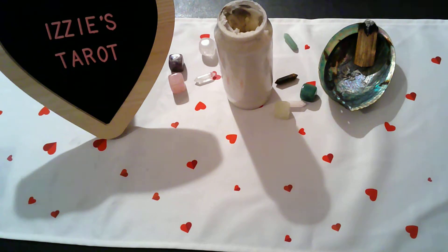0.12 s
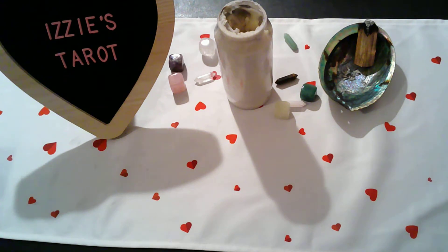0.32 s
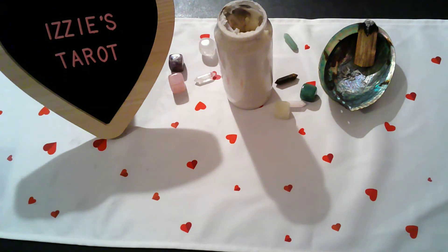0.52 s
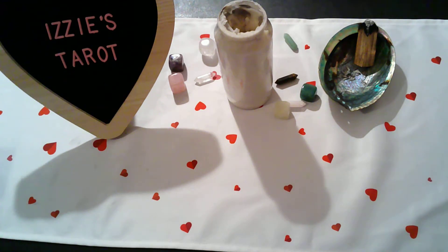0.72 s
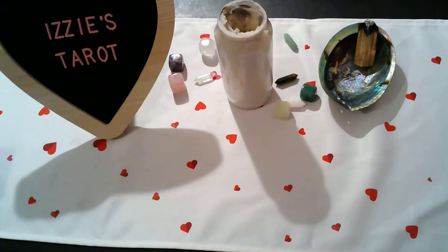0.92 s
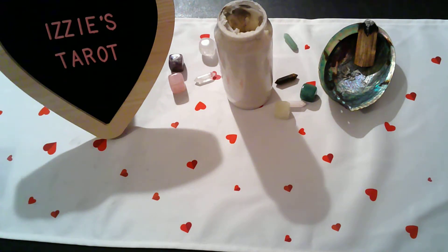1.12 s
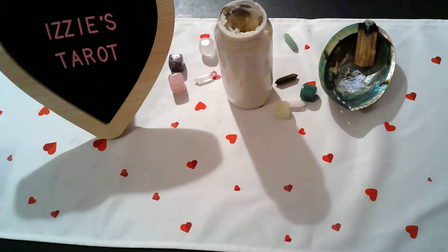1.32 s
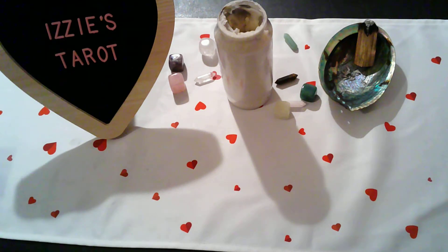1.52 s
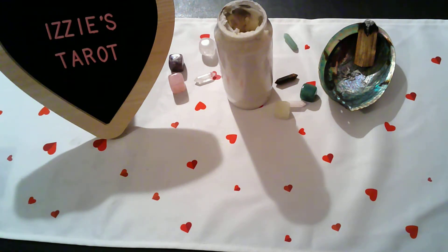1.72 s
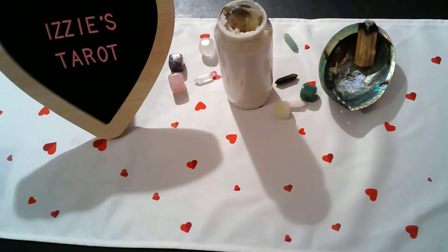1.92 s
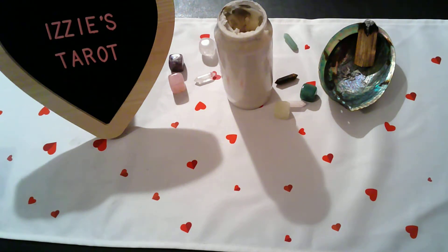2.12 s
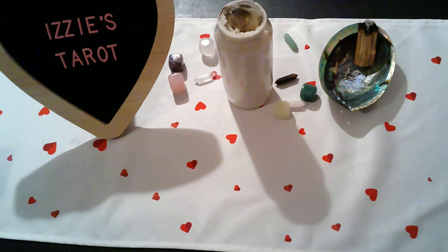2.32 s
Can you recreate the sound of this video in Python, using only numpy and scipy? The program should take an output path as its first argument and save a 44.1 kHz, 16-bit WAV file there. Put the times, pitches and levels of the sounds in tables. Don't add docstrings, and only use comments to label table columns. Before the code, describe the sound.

A stiff card snaps off a deck at about 0.2 seconds, a tight cluster of sharp, papery clicks with a small low thump, the loudest moment. Faint brushing and rustling follow, with a light tap near 0.74. After very quiet movements, a card pats softly onto cloth at 2.17, then edges brush lightly around 2.3. Small, dry, quiet room with low rumble; close, slightly ringing microphone with dulled treble.

```python
import sys
import numpy as np
from scipy import signal
from scipy.fft import rfft, irfft
from scipy.io import wavfile
from scipy.ndimage import uniform_filter1d

SR = 44100
rng = np.random.default_rng(int(sys.argv[2]) if len(sys.argv) > 2 else 0)


def boost(x):
    u = np.asarray(x, float) / 20
    return 10 ** u


def master(y):
    cut = np.clip(np.atleast_2d(y).T, -1, 1)
    pcm = np.round(cut * 32767)
    wavfile.write(sys.argv[1], SR, pcm.astype(np.int16))


N = 108045


def since(at_s):
    return np.arange(N) / SR - at_s


def unit(x):
    return x / np.sqrt(np.mean(x ** 2))


def band(x, hz, width_hz):
    b, a = signal.iirpeak(min(hz, 0.45 * SR), hz / width_hz, fs=SR)
    return signal.lfilter(b, a, x)


def butter(x, hz, kind, order):
    return signal.sosfilt(signal.butter(order, hz, kind, fs=SR, output="sos"), x)


def walk(rate_hz):
    span = int(SR / rate_hz)
    drift = uniform_filter1d(rng.standard_normal(N), span)
    return unit(uniform_filter1d(drift, span))


def ring(at_s, hz, t60_s):
    age = np.maximum(since(at_s), 0)
    return np.sin(2 * np.pi * hz * age) * np.exp(-np.log(1000) * age / t60_s)


def touch(at_s, rise_s, fall_s):
    age = since(at_s)
    return np.exp(-(age / np.where(age < 0, rise_s, fall_s)) ** 2 / 2)


def fibres():
    clicks_per_s, uneven_db = 3000, 3
    chance = rng.random((2, N))
    strength = boost(-uneven_db * np.log(chance[1] + 1e-9))
    clicks = (chance[0] < clicks_per_s / SR) * strength * rng.standard_normal(N)
    grain = unit(clicks) + 0.8 * rng.standard_normal(N)
    return grain * boost(1.6 * walk(80))


def room_tone():
    # f/Hz, level per Hz/dB
    tone = np.array([(30, -5), (60, -4.5), (110, 2.5), (300, -4.5), (700, -14.5), (2000, -18.5),
                     (4800, -35.5), (8000, -45.5)])
    level_db, flicker_db, flicker_hz = -57.5, 1.24, 3.85
    hz = np.maximum(np.fft.rfftfreq(N, 1 / SR), 1)
    colour = boost(np.interp(np.log(hz), np.log(tone[:, 0]), tone[:, 1]))
    spectrum = rfft(rng.standard_normal(N)) * colour * (hz > 18)
    air = 0
    for octave in range(10):
        share = np.clip(1 - np.abs(np.log2(hz / 25) - octave), 0, 1)
        air = air + irfft(spectrum * share, N) * boost(flicker_db * walk(flicker_hz))
    return unit(air) * boost(level_db)


def brushes():
    # peak t/s, rise/s, fall/s, level/dB, scrape f/Hz
    scrapes = [(.002, 0.012, 0.013, -57, 2100), (.004, .01, 0.023, -63.5, 595),
               (.004, 0.012, 0.028, -66, 3270), (0.181, 0.0027, 0.025, -59, 2200),
               (0.199, .008, 0.0098, -53, 1200), (0.228, 0.013, 0.004, -47.5, 2450),
               (.33, 0.033, 0.045, -68, 1500), (.448, 0.019, 0.016, -62.5, 2360),
               (.58, 0.044, 0.01, -75, 890), (0.745, 0.0051, 0.021, -61, 1950),
               (.745, 0.011, 0.013, -64, 3070), (.448, .01, 0.021, -68.5, 880),
               (1.219, 0.07, 0.013, -71, 1110), (1.40, .008, .015, -70, 2600),
               (1.53, 0.0042, .04, -74, 1500), (2.143, .012, 0.014, -55.5, 3270),
               (2.172, .008, 0.011, -59.5, 1270), (2.171, 0.0075, 0.0057, -50.5, 2670),
               (2.296, 0.0089, 0.014, -65, 1870), (2.339, 0.015, .008, -54, 1840),
               (2.328, 0.0035, .014, -57, 2600), (2.341, 0.0044, 0.0094, -65, 1280)]
    body_hz, body_top_hz, body_db = 743, 2600, -2.5
    relative_width = 0.23
    grain = fibres()
    body = butter(band(grain, body_hz, body_hz), body_top_hz, "low", order=2)
    body = boost(body_db) * unit(body)
    out = np.zeros(N)
    for at_s, rise_s, fall_s, db, hz in scrapes:
        width_hz = relative_width * hz
        edge = unit(band(band(grain, hz, width_hz), hz, 2.07 * width_hz))
        out += boost(db) * touch(at_s, rise_s, fall_s) * (edge + body)
    return out


def rustles():
    # peak t/s, rise/s, fall/s, level/dB
    movements = [(.008, .01, 0.023, -61.5), (.07, .02, 0.1, -78.5), (.2, .006, .012, -53),
                 (.35, 0.046, 0.021, -68.5), (.45, 0.026, 0.034, -70.5), (.54, 0.044, 0.032, -72),
                 (.67, 0.011, 0.063, -76.5), (.755, 0.013, .04, -70), (.86, 0.032, 0.053, -72.5),
                 (.96, 0.015, .02, -72), (1.18, 0.035, 0.025, -69.5), (1.22, 0.019, 0.023, -69),
                 (1.405, .02, 0.017, -70), (1.529, 0.0045, 0.036, -74), (1.72, 0.025, 0.063, -76.5),
                 (1.93, 0.055, .02, -75.5), (2.145, 0.014, 0.013, -64), (2.167, 0.01, 0.015, -57.5),
                 (2.24, .03, .03, -78), (2.29, 0.036, 0.03, -68), (2.349, 0.016, 0.017, -63),
                 (2.41, .03, .03, -75)]
    hiss = unit(butter(fibres(), 3700, "high", order=2))
    swell = np.zeros(N)
    for at_s, rise_s, fall_s, db in movements:
        swell += boost(db) * touch(at_s, rise_s, fall_s)
    return hiss * swell


def flicks():
    # t/s, level/dB, bending f/Hz, ring/s, crack level against the bending/dB
    snaps = [(0.1769, -44, 2000, .006, -9), (0.1901, -25.5, 1410, 0.0039, -18),
             (.1965, -35.5, 1000, .004, -8), (.2107, -25, 500, 0.031, -42),
             (0.2114, -19, 1633, .011, -14.5), (.2130, -17, 1115, 0.0056, -18.5),
             (0.2135, -17.5, 2400, 0.0059, -15), (.2145, -17.5, 1020, 0.01, -15),
             (.2160, -23, 3450, 0.0027, -19), (.2184, -20, 2080, 0.0047, -28),
             (0.2224, -24, 1630, 0.0071, -13), (.2283, -28.5, 1000, 0.0023, -19),
             (0.2299, -32.5, 1590, 0.007, -13), (0.7372, -47.5, 1800, 0.0093, -27),
             (.7430, -43, 810, 0.012, -26), (2.1675, -44.5, 4960, 0.0077, 1.5),
             (2.1760, -47, 2660, 0.004, -14), (2.2934, -54.5, 3000, .002, 0.5)]
    crack_fade_s = 0.0015
    noise = rng.standard_normal(N)
    out = np.zeros(N)
    for at_s, db, hz, t60_s, crack_db in snaps:
        age = since(at_s)
        crack = (age >= 0) * np.exp(-np.abs(age) / crack_fade_s) * noise
        out += boost(db) * (ring(at_s, hz, t60_s) + boost(crack_db) * crack)
    return out


def pats():
    # t/s, level/dB, f/Hz, ring/s
    thumps = [
        (0.1941, -27.5, 330, 0.0078),
        (0.2128, -26, 239, 0.026),
        (.7350, -43.5, 316, 0.031),
        (2.1675, -26, 343, 0.014),
        (2.172, -39, 210, .03),
    ]
    out = np.zeros(N)
    for at_s, db, hz, t60_s in thumps:
        soft_start = 1 - np.exp(-np.abs(since(at_s)) * hz * 7.6)
        out += boost(db) * ring(at_s, hz, t60_s) * soft_start
    return out


def room(x):
    t60_s, level_db, gap_s, top_hz = 0.25, -12, 0.0032, 5130
    age = np.arange(SR // 2) / SR
    fade = (age > gap_s) * np.exp(-np.log(1000) * age / t60_s)
    tail = butter(rng.standard_normal(len(age)) * fade, top_hz, "low", order=1)
    tail = tail / np.sqrt(np.sum(tail ** 2))
    return boost(level_db) * signal.fftconvolve(x, tail)[:N]


def scene():
    cards = brushes() + rustles() + flicks() + pats()
    cards = butter(cards, 174, "high", order=3)
    return (cards + room(cards) + room_tone())[None]


def low_pass(x):
    return signal.sosfilt(signal.butter(12, 9260, fs=SR, output="sos"), x)


def record(dry):
    ring_hz, ring_width_hz, ring_db = 7020, 626, 17
    roll_off_hz, top_hz = 7590, 8850
    x = dry + boost(ring_db) * band(dry, ring_hz, ring_width_hz)
    x = butter(x, roll_off_hz, "low", order=8)
    x = signal.sosfilt(signal.ellip(8, 0.5, 70, top_hz, fs=SR, output="sos"), x)
    return low_pass(x)


dry = scene()
out = record(dry)
master(out)
```